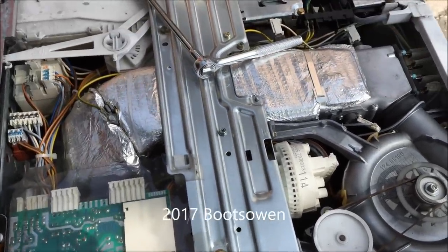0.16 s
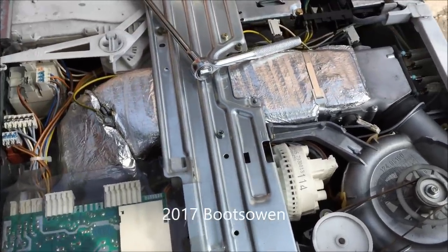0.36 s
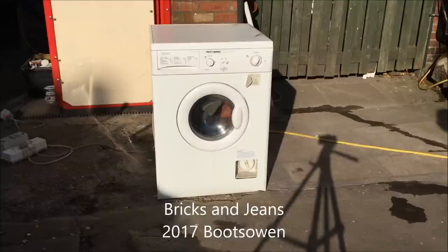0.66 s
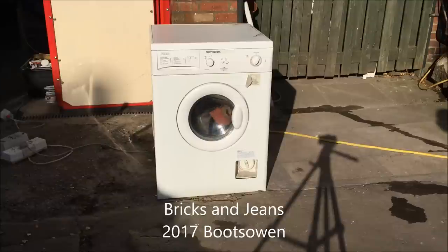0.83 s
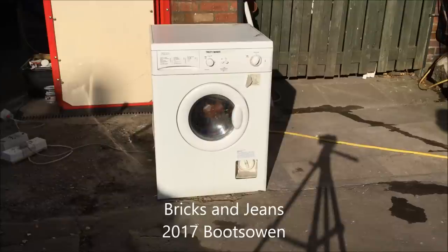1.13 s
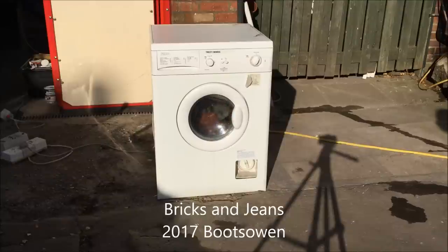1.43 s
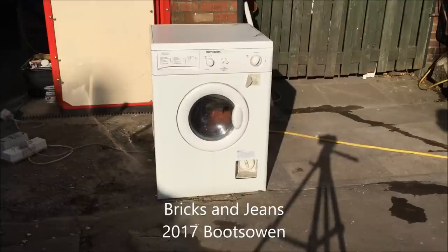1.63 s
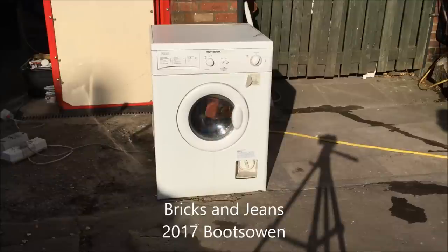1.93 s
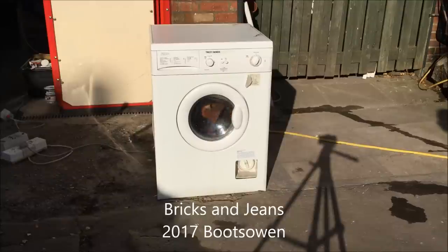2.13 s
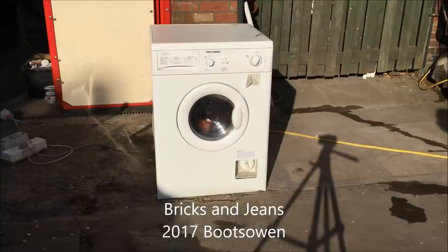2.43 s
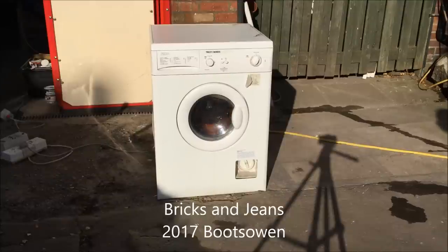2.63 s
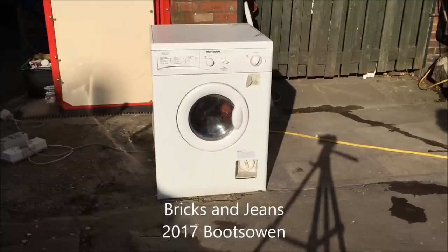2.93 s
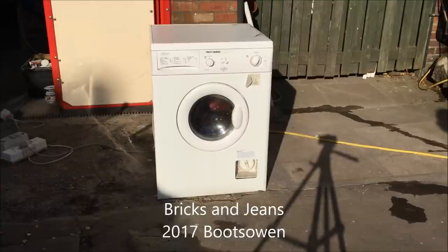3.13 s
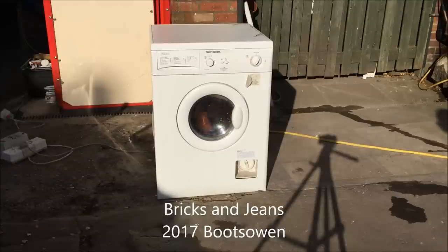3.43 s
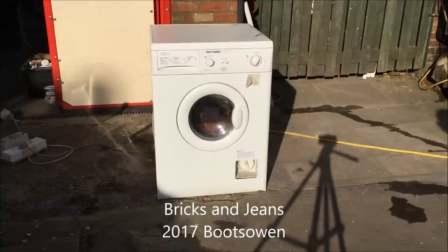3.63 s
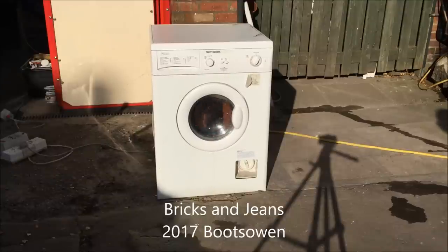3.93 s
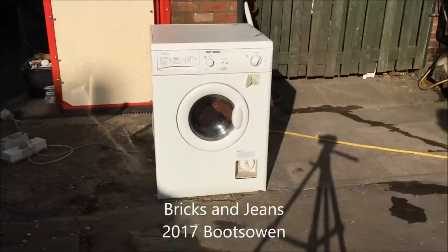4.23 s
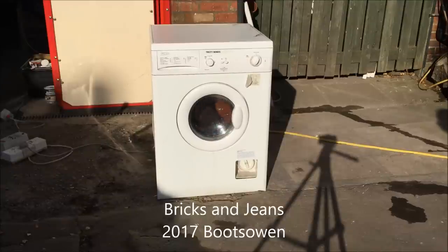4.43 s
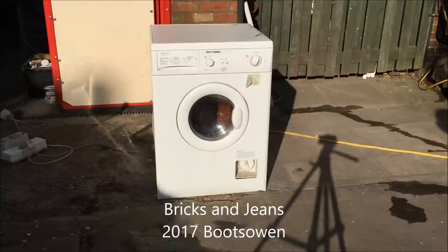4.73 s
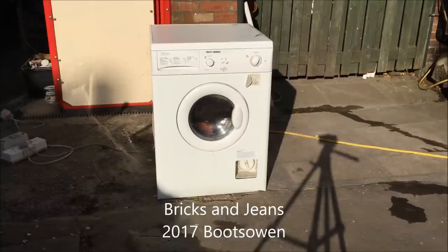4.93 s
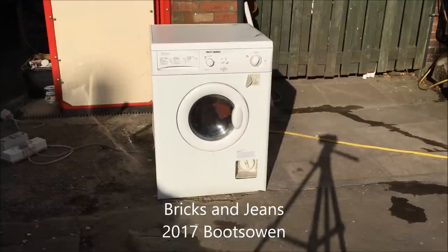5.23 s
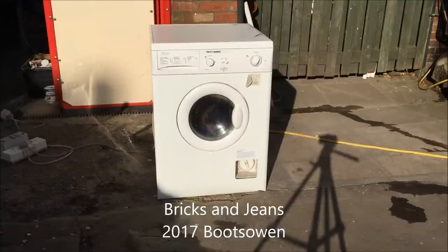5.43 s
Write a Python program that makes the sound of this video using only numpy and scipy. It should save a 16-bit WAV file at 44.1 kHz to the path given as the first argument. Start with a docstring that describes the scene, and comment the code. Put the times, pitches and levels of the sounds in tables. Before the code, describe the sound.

A quiet machine whir cuts off, then after a brief silence bricks thud, roll and bang hard in a washing machine's steel drum.

```python
"""In a paved yard, bricks tumble in the turning drum of a washing machine. The sound opens on another scene, a
steady whir (coloured noise) that stops short; after a brief silence the scene changes to the running motor
(noise and wavering narrow-band tones). Bricks roll (random bumps into drum modes), thud and crash (contact
swing, panel clatter and drum modes in four bands), shedding grit; a few edges squeak. Nearby walls throw the
bangs back as short, dull echoes."""
import sys
import numpy as np
from scipy import signal
from scipy.fft import rfft, irfft, next_fast_len
from scipy.io import wavfile
from scipy.ndimage import uniform_filter1d

SR = 44100
rng = np.random.default_rng(int(sys.argv[2]) if len(sys.argv) > 2 else 0)


def wrap_up_sound(samples):
    """Save the sound to the file named by the first command line argument, as 16-bit audio."""
    columns = np.atleast_2d(samples).T
    # keep every value between -1 and 1, then stretch to whole-number steps
    tamed = np.clip(columns, -1, 1)
    steps = np.round(tamed * 32767).astype(np.int16)
    wavfile.write(sys.argv[1], SR, steps)


N = 245637
TIME_S = np.arange(N) / SR
BLOW_S = np.arange(2 ** 15) / SR  # time axis of one blow

# brick falls on its corner: start_s, thump_db, knock_db, clank_db, tub_boom_db, directness_0_to_1
CORNER_BANGS = [(0.6655, -31, -35.5, -43.5, -30, 0.36), (0.936, -19.5, -21.5, -27, -23.5, 0.18),
                (0.9805, -27, -22.5, -34.5, -22.5, 0.45), (1.049, -35.5, -19, -33, -45.5, 0.81),
                (1.1891, -28.5, -27.5, -54, -53, 0.73), (1.307, -39, -32.5, -42, -53, 0.02),
                (1.4347, -20.5, -18, -20, -14.5, 0.33), (1.502, -33, -26, -38, -32, 0.63),
                (1.961, -28, -26, -42, -20.5, .65), (2.1386, -21.5, -18, -25.5, -22, 0.4),
                (2.6061, -19, -15, -20, -16.5, 0.68), (3.4844, -28, -24.5, -39.5, -59, 0.6),
                (4.3432, -27, -11.5, -26.5, -19.5, 0.81), (4.908, -40, -36.5, -48.5, -62, 0.56)]
# brick topples onto its face: start_s, thump_db, knock_db (before the thud trim and treble cut)
FACE_THUDS = [(1.085, -31, -46), (1.144, -26, -28.5), (1.355, -22.5, -25), (1.582, -30, -55),
              (1.941, -26.5, -33.5), (1.988, -27, -30.5), (2.032, -25, -33), (2.081, -22, -22),
              (2.223, -26.5, -35), (2.332, -23.5, -23.5), (2.436, -24.5, -26.5), (2.535, -30.5, -32.5),
              (2.586, -18.5, -28.5), (3.064, -33, -35.5), (3.169, -30, -31), (3.212, -26.5, -30.5),
              (3.336, -26.5, -29.5), (3.38, -23.5, -34), (3.538, -25, -25), (3.617, -23.5, -26),
              (3.653, -32.5, -28), (3.802, -30.5, -35), (3.925, -34.5, -43), (4.009, -30, -26.5),
              (4.048, -29.5, -32.5), (4.253, -32.5, -44), (4.324, -25.5, -32), (5.474, -30.5, -40),
              (5.501, -24.5, -29)]
# brick edge scrapes along the steel: start_s, length_s, pitch_hz, level_db
EDGE_SQUEAKS = [(0.748, 0.18, 1930, -47.5), (0.792, 0.086, 5560, -61.5), (2.402, 0.041, 5400, -57),
                (2.713, 0.04, 5800, -57)]
# modes of drum, tub and cabinet: pitch_hz, relative_level_db (before scatter by place), t60_s
DRUM_MODES = [(66.3, -5.5, 0.73), (113.9, 1, 0.54), (130.4, 1.5, 0.74), (174.4, 3, 0.33),
              (237.6, 3.5, 0.14), (265.6, 6.5, 0.27), (293.3, 3.5, 0.4), (357, -8, 0.57),
              (372.8, -1.5, 0.38), (432.7, -8, 0.23), (473, -11, 0.21), (560.7, 2.5, 0.24), (653, 0, 0.37),
              (736.6, 5.5, 0.12), (767, -2.5, 0.19), (907, 1, 0.22), (1015.4, -0.5, 0.14), (1274, 1, 0.055),
              (1460, -21, 0.22), (1830, -26, 0.06), (1854, -13, 0.21), (2050, -13, 0.22), (2173, -12, 0.19),
              (2180, -21, 0.075), (2627, -2.5, 0.032), (5950, -26, 0.044)]
# colour of a blow's clatter: frequency_hz, relative_density_db
CRASH_COLOUR = [(45, -16), (70, -8), (120, -2), (205, 0), (300, -2), (500, -5.5), (850, -7), (1200, -13),
                (1650, -14), (2100, -12.5), (2550, -18), (3200, -25.5), (4800, -25.5), (6000, -24),
                (7500, -33), (15500, -47)]
# thump, knock, clank, grit: delay_s, rise_s, first_t60_s (rise and t60 of a hard contact),
# tail_db, tail_t60_s, ringing_db
REGISTER_SHAPES = [(0.00011, 0.00061, 0.22, -15.5, 0.61, -1), (0.00029, 0.00027, 0.13, -11, 0.41, -1),
                   (0.00036, 0.00076, 0.081, -16, 0.36, -6), (0.0004, 0.0012, 0.058, -13.5, 0.23, 1.5)]
# thump, knock, clank, grit: low_hz, high_hz
REGISTER_BANDS = [(45, 450), (450, 1500), (1500, 3200), (3200, 17000)]
# reflections from ground, door and fence: delay_s, gain_ratio
YARD_ECHOES = [(.0069, 0.36), (.0122, 0.15), (.0178, 0.083), (.0239, .27), (.0305, 0.14)]
# about once a turn the drum lifts the bricks until they roll and slide down:
# start_s, length_s, rumble_db, grinding_db (before the rolling trims)
TUMBLES = [(0.867, 0.61, -25, -34), (1.928, 1.1, -33.5, -39.5), (3.384, 0.28, -26, -32.5),
           (3.838, 0.96, -32, -38), (5.34, 0.46, -27, -41)]
# colour of the rolling: frequency_hz, relative_density_db
GRIND_COLOUR = [(50, -25), (120, 1.5), (300, 3.5), (480, 4.5), (900, -1), (1500, -16), (2500, -28.5),
                (3300, -32.5), (6000, -36.5), (9000, -87), (16000, -36)]
# colour of motor and belt noise: frequency_hz, relative_density_db
MOTOR_COLOUR = [(15, -30), (25, -26), (79, 5), (113, 6), (148, -3), (349, -1), (482, -20), (598, -3),
                (741, -12), (945, -2.5), (1300, -9.5), (1570, -10.5), (3340, -30), (15500, -48.5)]
# cabinet hum, motor and bearing whine: pitch_hz, width_hz, level_db (before waver)
WHINE_TONES = [(55, 22, -50), (285, 70, -58), (2200, 120, -68), (2520, 450, -68), (4680, 130, -78),
               (5850, 500, -77), (9100, 900, -80), (11400, 900, -84)]
# colour of the opening scene's whir: frequency_hz, relative_density_db
WHIR_COLOUR = [(15, -40), (25, -25), (55, -5), (120, -14.5), (427, -17.5), (489, -18), (591, -20),
               (1130, -16), (1520, -25.5), (2000, -30.5), (2610, -41), (3250, -37.5), (4490, -50.5),
               (16000, -67)]

WHIR_END_S, MOTOR_START_S = 0.372, 0.449
WHIR_DB, MOTOR_NOISE_DB = -43, -42
EDGE_HZ = 15900
# contact of a middling blow; a heavier one presses longer: lower pitch, sooner damped
MIDDLING_THUMP_DB, CONTACT_HZ, SAG_HZ_PER_DB = -30.5, 821, 8.5
SWING_CYCLES, DAMPING_PER_DB = 0.75, 0.0959
GRIT_DB = -11.5  # crushed grit re hardness (mean of knock and clank)
SLIP_S, SETTLE_T60_S = 0.047, 0.54  # a tumble gathers speed, then comes to rest
CREEP_RUMBLE_DB, CREEP_GRIND_DB = -42, -44.5  # bricks never quite still; before the rolling trims
# chance light topplings: levels re untrimmed rumble, before the thud trim
NUDGES_PER_S, NUDGE_THUMP_DB, NUDGE_KNOCK_DB, NUDGE_SPREAD_DB = 4, -5.5, -8.5, 1
BUMP_RISE_S = 0.0004  # each bump's drum ringing fades in over a fraction of a millisecond


def bangs(clack_hz=2200, clack_db=-6, splinter_db=-30):
    """Hard landings: sharp swing, clack of the brick, ringing drum, tub boom and a spit of grit."""
    out = np.zeros(N)
    for start_s, thump_db, knock_db, clank_db, boom_db, direct in CORNER_BANGS:
        hz, cycles, grit_db = landing(thump_db, knock_db, clank_db)
        thump, knock, clank, grit = registers(BLOW_S)
        swing = contact(BLOW_S, hz, cycles)
        knock = struck(np.sqrt(direct) * swing + np.sqrt(1 - direct) * knock)
        clack = contact(BLOW_S, clack_hz, cycles=1.1)
        clank = struck(clank + amp(clack_db) * clack)
        # harder blows crush finer, brighter grit
        splinters = np.diff(grit, prepend=0)
        grit = struck(grit + amp(grit_db - splinter_db) * splinters)
        add(out, start_s, amp(thump_db) * thump + amp(knock_db) * knock + amp(boom_db) * boom(BLOW_S))
        add(out, start_s, amp(clank_db) * clank + amp(grit_db) * grit)
    return out


def landing(thump_db, knock_db, clank_db):
    """Contact pitch (Hz), swing length (cycles) and grit (dB) from a blow's weight and hardness."""
    weight_db = thump_db - MIDDLING_THUMP_DB
    hardness_db = (knock_db + clank_db) / 2
    pitch_hz = CONTACT_HZ - SAG_HZ_PER_DB * weight_db
    cycles = SWING_CYCLES * np.exp(-DAMPING_PER_DB * weight_db)
    return pitch_hz, cycles, hardness_db + GRIT_DB


def contact(t_s, hz, cycles, echo_hz=1800):
    """The panel's first short swing under the brick, then its duller reflections."""
    u = t_s * hz / cycles
    envelope = (u ** 2 * np.exp(-u)) ** 2
    swing = envelope * np.sin(2 * np.pi * hz * t_s)
    dull = signal.lfilter(*signal.butter(1, echo_hz, fs=SR), swing)
    for delay_s, gain in YARD_ECHOES:
        add(swing, delay_s, gain * dull)
    return struck(swing)


def registers(t_s, softness_s=0.0):
    """Panel clatter plus drum modes in four bands; soft contact slows attack and first decay."""
    clatter = coloured(crumbling(count=len(t_s)), CRASH_COLOUR)
    ring = drum_ring(t_s)
    parts = []
    for edges_hz, shape in zip(REGISTER_BANDS, REGISTER_SHAPES):
        delay_s, rise_s, first_t60_s, tail_db, tail_t60_s, ring_db = shape
        age_s = np.maximum(t_s - delay_s, 0)
        attack = 1 - np.exp(-age_s / (rise_s + softness_s))
        first = dying(age_s, first_t60_s + 10 * softness_s)
        fall = np.hypot(first, amp(tail_db) * dying(age_s, tail_t60_s))
        panels = struck(band(clatter * attack * fall, *edges_hz))
        modes = struck(band(ring * attack, *edges_hz))
        parts.append(struck(panels + amp(ring_db) * modes))
    return parts


def drum_ring(t_s, place_db=3.0):
    """Decaying drum modes; each place of impact weights them differently."""
    ring = np.zeros(len(t_s))
    for hz, db, t60_s in DRUM_MODES:
        level = amp(db + place_db * rng.standard_normal())
        ring += level * dying(t_s, t60_s) * np.sin(2 * np.pi * (hz * t_s + rng.random()))
    return ring


def crumbling(count, grain_db=2, grain_s=0.00099):
    """Noise of crushed brick, in short spurts."""
    width = max(round(grain_s * SR), 1)
    spurts = evened(uniform_filter1d(rng.standard_normal(count), width))
    return rng.standard_normal(count) * amp(grain_db * spurts)


def boom(t_s, hz=383, peak_s=0.031, width_s=0.009):
    """The drum hands its energy to the tub, whose tone swells a moment after the blow."""
    pitch_hz = hz * rng.uniform(0.947, 1.03)
    swell = np.exp(-((t_s - peak_s) / width_s) ** 2)
    return np.sqrt(2) * swell * np.sin(2 * np.pi * (pitch_hz * t_s + rng.random()))


def thuds(trim_db=-2.5, clank_db=-14.5, grit_db=-26, softness_s=0.0061, dull_hz=5000,
          push_hz=300, slap_hz=680, direct_db=-7):
    """Flat landings: a slow push and a slap on the drum wall, with little treble."""
    out = np.zeros(N)
    for start_s, thump_db, knock_db in FACE_THUDS + nudges():
        thump, knock, clank, grit = registers(BLOW_S, softness_s)
        stiffness = 2 ** rng.uniform(-0.29, 0.52)  # depends on where the brick lands
        push = contact(BLOW_S, push_hz * stiffness, cycles=0.9)
        slap = contact(BLOW_S, slap_hz * stiffness, cycles=0.83)
        thump = struck(thump + amp(direct_db) * push)
        knock = struck(knock + amp(direct_db) * slap)
        treble = amp(clank_db) * clank + amp(grit_db) * grit
        add(out, start_s, amp(thump_db) * thump + amp(knock_db) * (knock + treble))
    return amp(trim_db) * signal.lfilter(*signal.butter(2, dull_hz, fs=SR), out)


def nudges(count=24):
    """Light topplings at loose intervals, following the rolling: rows start_s, thump_db, knock_db."""
    place, size = rng.uniform(-1, 1, (count, 2)).T
    start_s = MOTOR_START_S + (np.arange(count) + 0.5 + 0.5 * place) / NUDGES_PER_S
    rumble, _ = tumbling()
    level_db = 20 * np.log10(np.interp(start_s, TIME_S, rumble)) + NUDGE_SPREAD_DB * size
    return list(zip(start_s, level_db + NUDGE_THUMP_DB, level_db + NUDGE_KNOCK_DB))


def rolling(bumps_per_s=260, spread_db=4, ring_db=-1, rumble_trim_db=-5.5, grind_trim_db=-2, places=3):
    """Rough brick faces bump over a few places of the perforated steel and keep the drum ringing."""
    hits = rng.random(N) < bumps_per_s / SR
    force = amp(spread_db * np.minimum(rng.exponential(1, N), 2))
    bumps = hits * rng.choice([-1, 1], N) * force
    place = rng.integers(0, places, N)
    scuffs, rings = np.zeros(N), np.zeros(N)
    for k in range(places):
        here = bumps * (place == k)
        scuff = rng.standard_normal(len(BLOW_S)) * dying(BLOW_S, 0.056)
        ring = drum_ring(BLOW_S) * (1 - np.exp(-BLOW_S / BUMP_RISE_S))
        scuffs += signal.oaconvolve(here, scuff)[:N]
        rings += signal.oaconvolve(here, ring)[:N]
    body = coloured(scuffs, GRIND_COLOUR) + amp(ring_db) * evened(rings)
    rumble, grind = tumbling()
    low = evened(band(body, 30, 546)) * amp(rumble_trim_db) * rumble
    high = evened(band(body, 345, 17000)) * amp(grind_trim_db) * grind
    return low + high


def tumbling():
    """Gains of rumble and grinding: every tumble swells, holds and settles above the creep."""
    rumble = np.full(N, amp(CREEP_RUMBLE_DB))
    grind = np.full(N, amp(CREEP_GRIND_DB))
    for start_s, length_s, rumble_db, grind_db in TUMBLES:
        swell = np.clip((TIME_S - start_s) / SLIP_S, 0, 1)
        motion = swell * dying(np.maximum(TIME_S - start_s - length_s, 0), SETTLE_T60_S)
        rumble = np.hypot(rumble, amp(rumble_db) * motion)
        grind = np.hypot(grind, amp(grind_db) * motion)
    return rumble, grind


def squeaks(spread=0.25):
    """Brief stick and slip of a brick edge, as narrow noise under a half-sine stroke."""
    out = np.zeros(N)
    for start_s, length_s, hz, db in EDGE_SQUEAKS:
        stroke = np.sin(np.pi * np.clip((TIME_S - start_s) / length_s, 0, 1))
        out += amp(db) * stroke * fuzzy_tone(hz, spread * hz)
    return out


def motor(waver_db=4.0, flutter_db=-1.0):
    """Motor, belt and bearings; the shifting load makes their whine waver."""
    tones = np.zeros(N)
    for hz, width_hz, db in WHINE_TONES:
        tones += amp(db + waver_db * drift(19)) * fuzzy_tone(hz, width_hz)
    level = amp(MOTOR_NOISE_DB + flutter_db * drift(12.0))
    return tones + level * coloured(rng.standard_normal(N), MOTOR_COLOUR)


def whir():
    """An even whir in the opening scene: coloured noise with slight level drift."""
    return amp(WHIR_DB + 0.5 * drift(22)) * coloured(rng.standard_normal(N), WHIR_COLOUR)


def fuzzy_tone(hz, width_hz):
    """Narrow band of noise of rms 1: a tone that never holds still."""
    turn = 2 * np.pi * hz * TIME_S
    return drift(width_hz / 2) * np.cos(turn) + drift(width_hz / 2) * np.sin(turn)


def drift(rate_hz):
    """Slow random wander of rms 1: noise under a Gaussian low-pass."""
    size = next_fast_len(N)
    f_hz = np.fft.rfftfreq(size, 1 / SR)
    spectrum = rfft(rng.standard_normal(size)) * np.exp(-(f_hz / rate_hz) ** 2)
    return evened(irfft(spectrum, size)[:N])


def coloured(x, points):
    """Filters by a (frequency_hz, db) table, log-frequency interpolated, to rms 1."""
    hz, db = np.transpose(points)
    f_hz = np.fft.rfftfreq(len(x), 1 / SR)
    gain = amp(np.interp(np.log(f_hz + 1), np.log(hz + 1), db))
    return evened(irfft(rfft(x) * gain, len(x)))


def band(x, low_hz, high_hz):
    """Causal Butterworth band-pass."""
    sos = signal.butter(3, [low_hz, high_hz], "band", fs=SR, output="sos")
    return signal.sosfilt(sos, x)


def amp(db):
    """Decibels to gain."""
    return 10 ** (np.asarray(db) / 20)


def evened(x):
    """Scales to rms 1."""
    return x / np.sqrt(np.mean(x ** 2) + 1e-20)


def struck(x):
    """Scales a blow so that its first 30 ms have rms 1."""
    return x / np.sqrt(np.mean(x[:round(0.03 * SR)] ** 2) + 1e-20)


def dying(t_s, t60_s):
    """Exponential decay, 60 dB in t60_s."""
    return np.exp(-np.log(1000) * t_s / t60_s)


def add(mix, start_s, sound):
    """Mixes a sound in place at start_s."""
    part = mix[max(round(start_s * SR), 0):][:len(sound)]
    part += sound[:len(part)]


def scene():
    """A first scene of whir, a moment of silence, then the scene changes to the tumbling bricks."""
    machine = bangs() + thuds() + rolling() + squeaks() + motor()
    return (machine * (TIME_S > MOTOR_START_S) + whir() * (TIME_S < WHIR_END_S))[None]


def record(dry):
    """Soft limit near full scale, then a linear-phase low-pass."""
    limited = dry / (1 + dry ** 8) ** (1 / 8)
    lowpass = signal.firwin(801, EDGE_HZ, window=("kaiser", 7), fs=SR)
    return signal.oaconvolve(limited, lowpass[None], "same")


dry = scene()
out = record(dry)
wrap_up_sound(out)
```